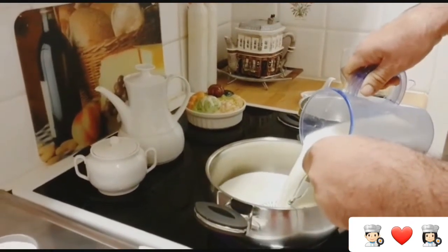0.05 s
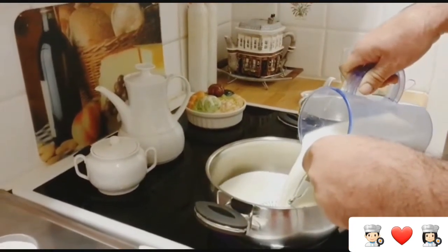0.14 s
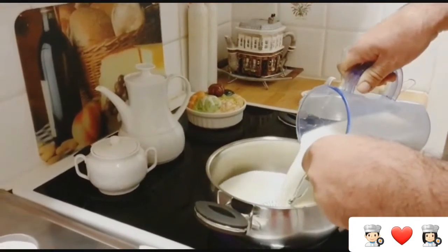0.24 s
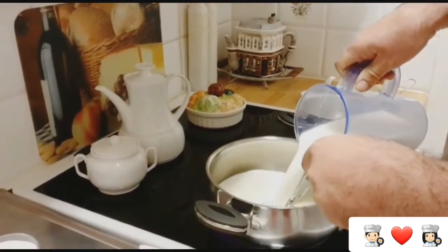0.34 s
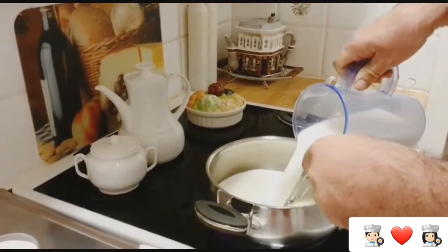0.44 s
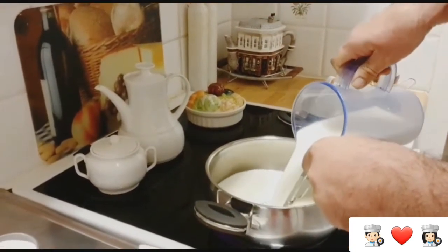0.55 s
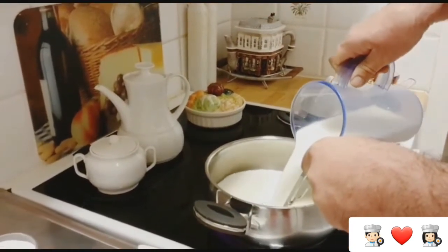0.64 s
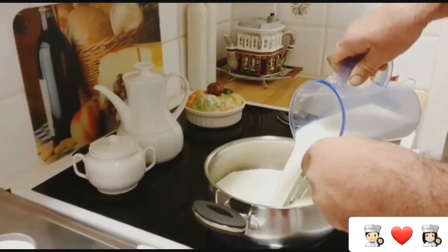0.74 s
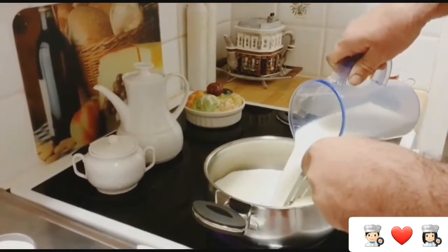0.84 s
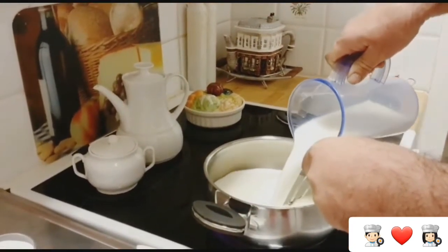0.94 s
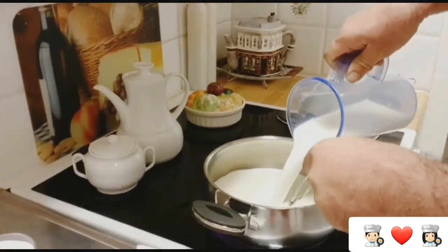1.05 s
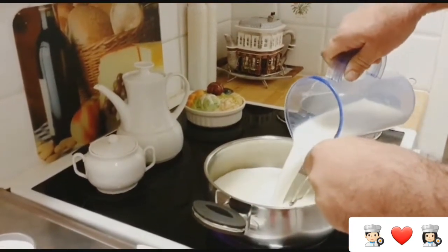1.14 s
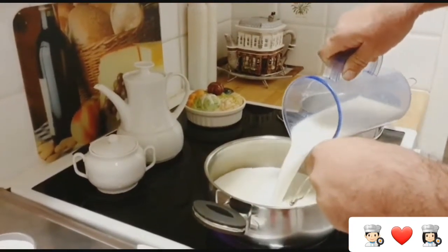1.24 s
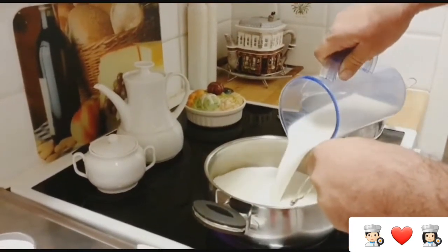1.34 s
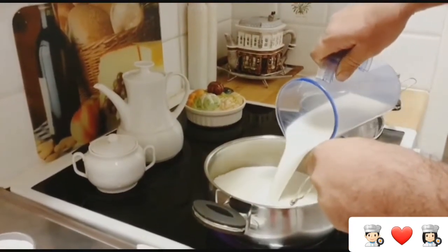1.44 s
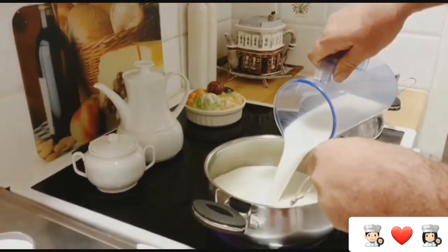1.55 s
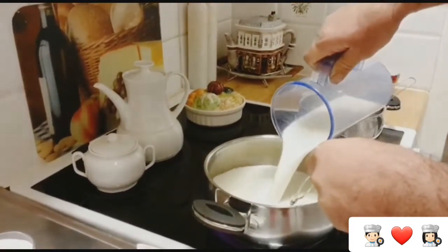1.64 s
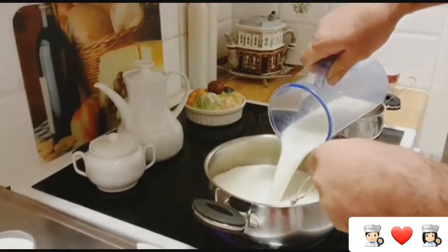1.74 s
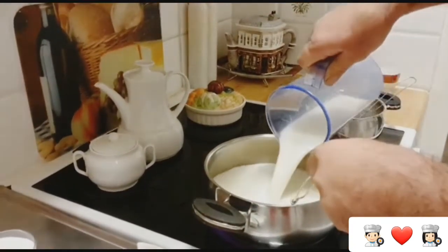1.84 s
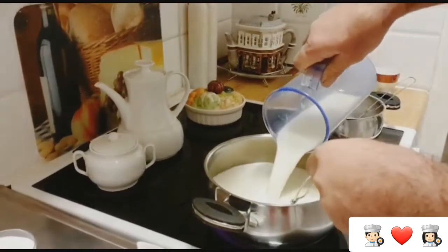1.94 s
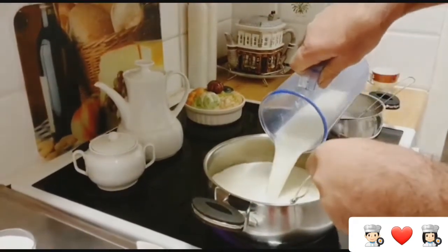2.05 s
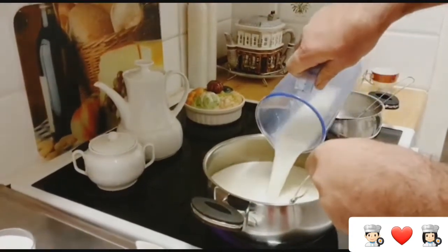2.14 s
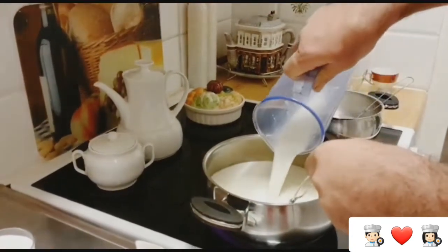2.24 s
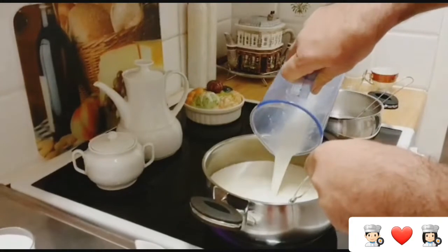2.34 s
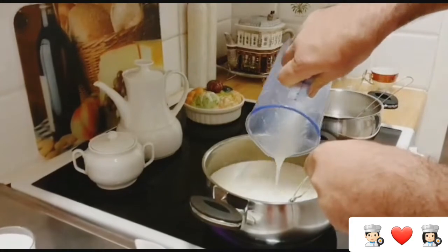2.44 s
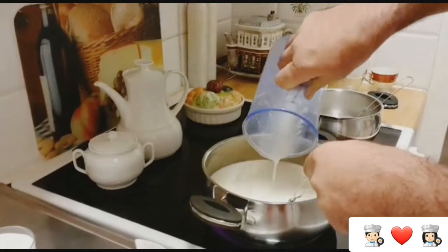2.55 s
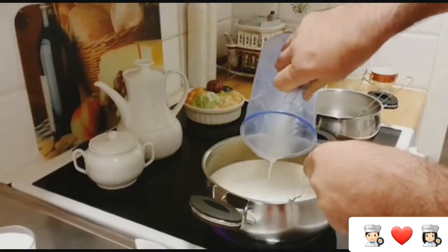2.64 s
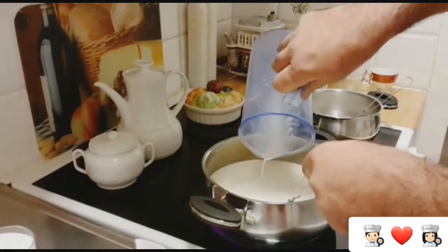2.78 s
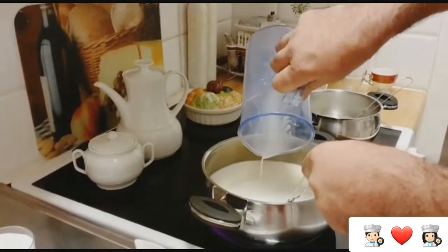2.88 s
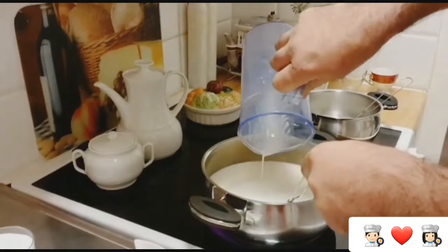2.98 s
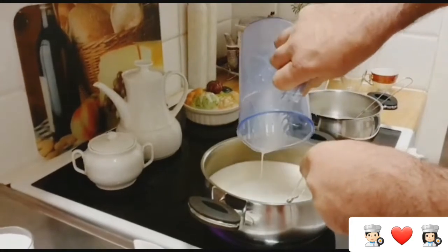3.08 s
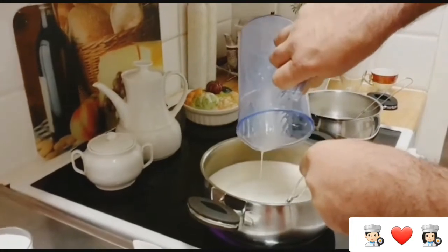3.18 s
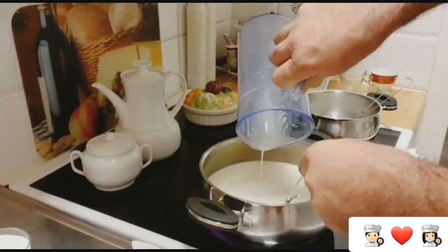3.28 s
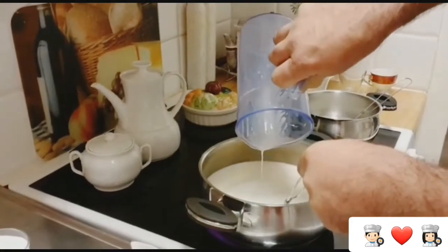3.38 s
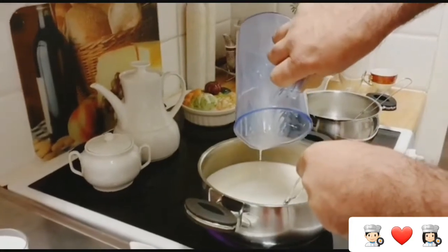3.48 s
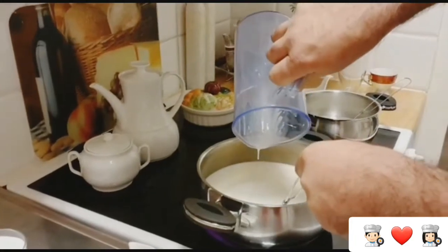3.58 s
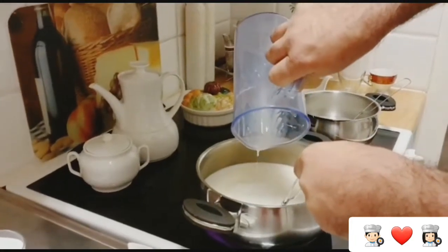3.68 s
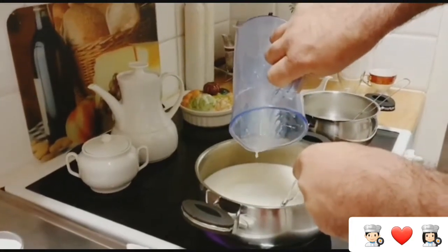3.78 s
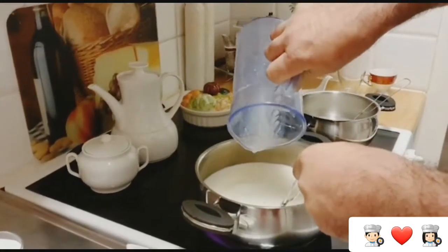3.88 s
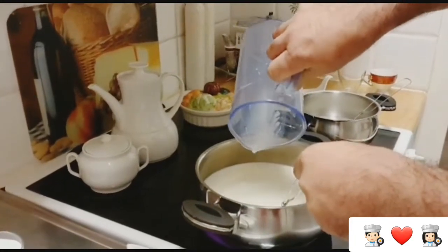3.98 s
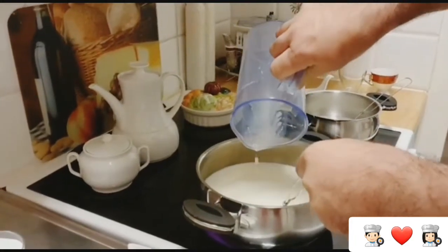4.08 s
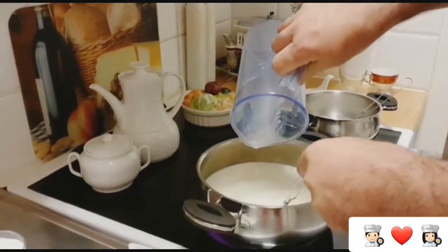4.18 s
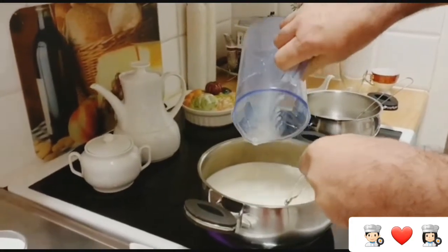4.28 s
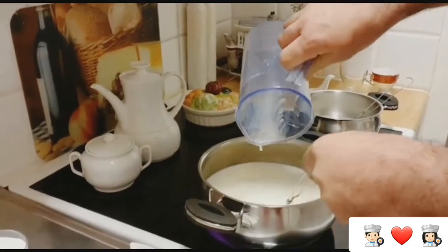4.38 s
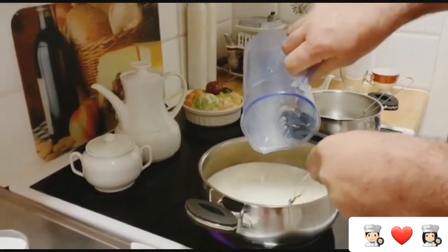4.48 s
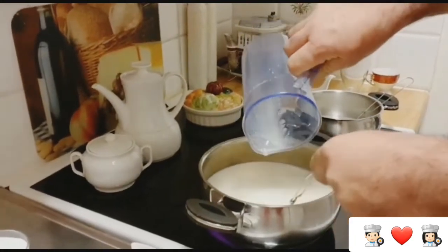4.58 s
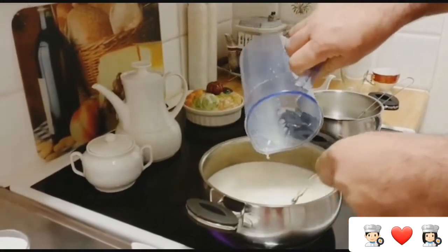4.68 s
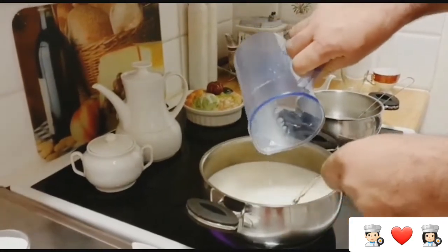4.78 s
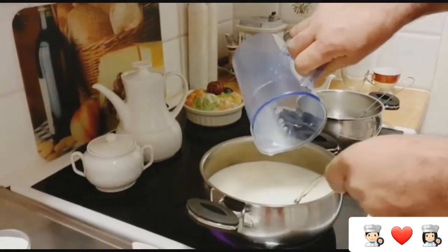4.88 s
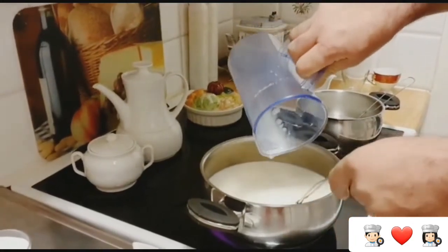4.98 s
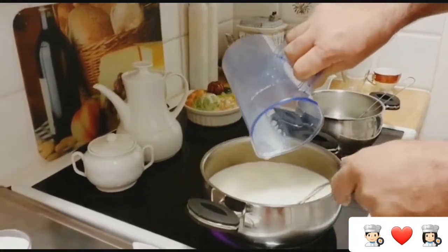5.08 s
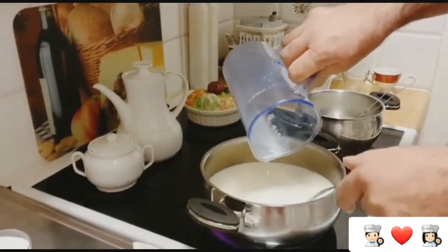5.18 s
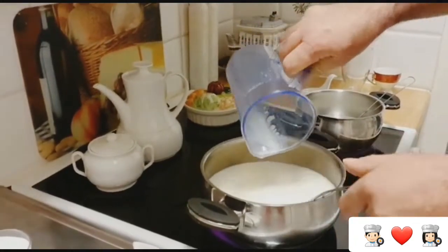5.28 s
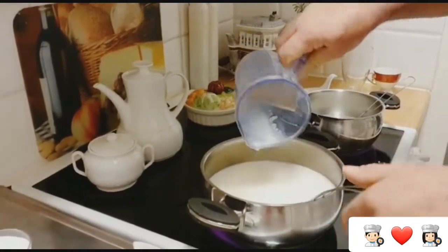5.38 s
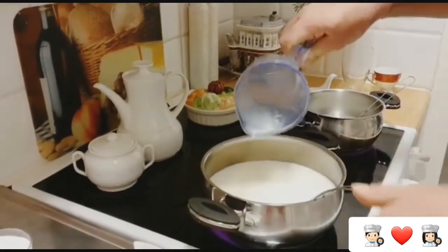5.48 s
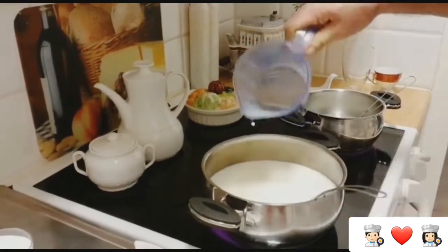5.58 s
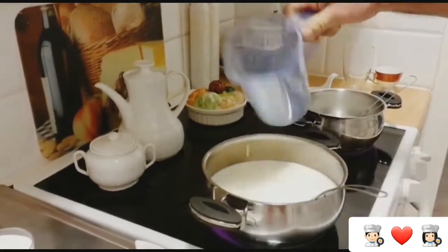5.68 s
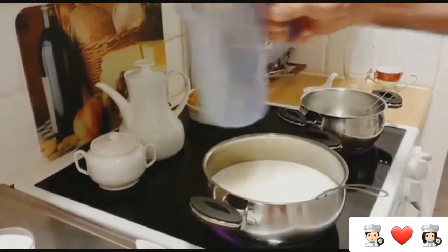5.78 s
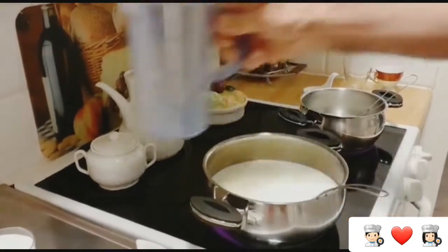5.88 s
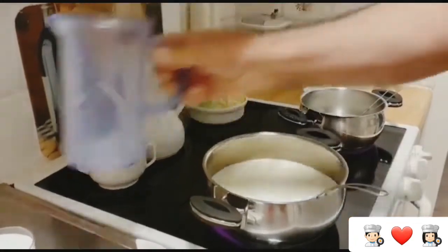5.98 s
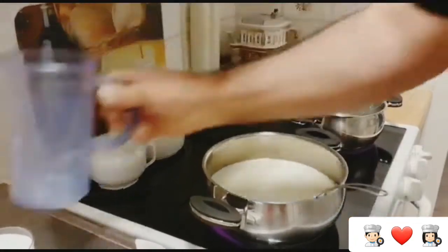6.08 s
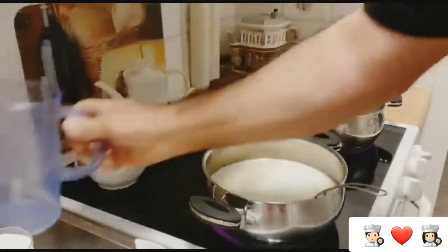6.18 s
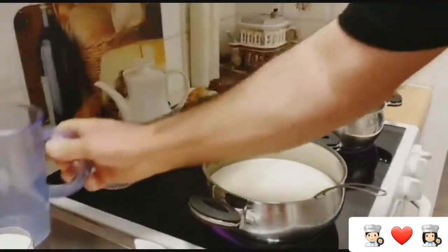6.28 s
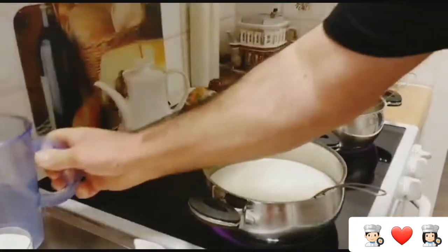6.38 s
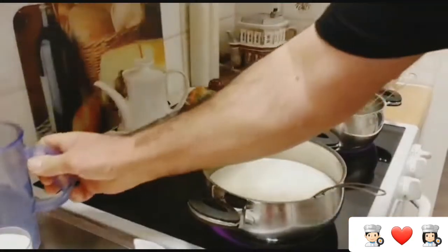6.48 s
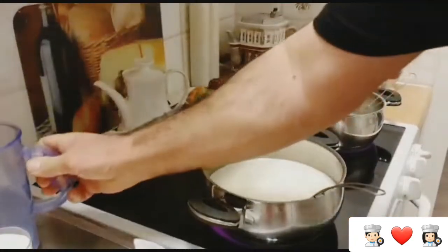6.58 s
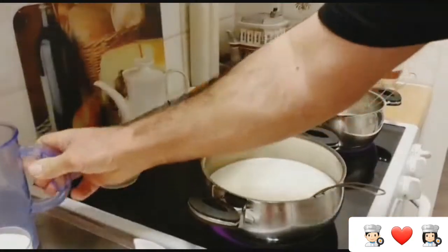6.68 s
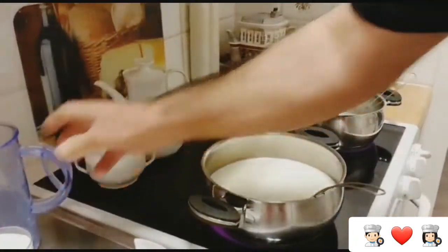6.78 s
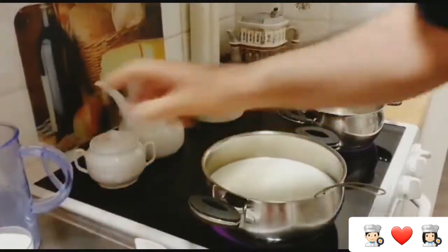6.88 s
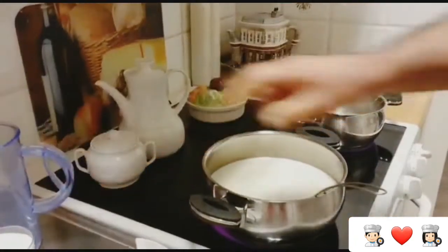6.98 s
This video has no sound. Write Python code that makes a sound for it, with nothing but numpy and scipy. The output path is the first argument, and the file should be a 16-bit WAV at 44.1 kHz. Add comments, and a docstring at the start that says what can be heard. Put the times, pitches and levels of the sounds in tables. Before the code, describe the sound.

Close stereo microphones catch milk trickling into a metal pot, busiest at first, then quieter, then a run of distinct drips. Rubbing and scraping from hands and a wire whisk follow, with one faint ting and a delicate metallic clink. Near the end a plastic jug lands firmly on the counter and rattles briefly. Quiet hum and short tiled-kitchen echoes surround it all.

```python
"""Milk runs from a plastic jug into a steel pot: decaying tones of bubbles, a trickle and noisy spray.
A hand then shifts a wire whisk along the rim and drops it (filtered grit, ringing modes), one wire tings
and the jug is set down on the counter (short pushes ring the modes of both).
A small hard kitchen with mains hum and floor bumps, heard by two spaced microphones."""
import sys
import numpy as np
from scipy import signal
from scipy.fft import rfft, irfft, next_fast_len
from scipy.io import wavfile
from scipy.ndimage import uniform_filter1d

SR = 44100
rng = np.random.default_rng(int(sys.argv[2]) if len(sys.argv) > 2 else 0)


def transcribe(u):
    """Save the signal u as a 16-bit wav file named by the first command-line argument.

    u: samples, shape (n,) or (channels, n), limited to [-1, 1]; the rate is SR.
    q: integer samples, one column per channel.
    """
    v = np.clip(np.atleast_2d(u).T, -1, 1)
    q = np.round(v * 32767).astype(np.int16)
    wavfile.write(sys.argv[1], SR, q)


N = 310023
LEFT_RIGHT = np.array([[1], [-1]])


def undb(db):
    """Gain of a level in dB."""
    return 10 ** (np.asarray(db) / 20)


def unit(x):
    """Scale to rms 1."""
    return x / np.sqrt(np.mean(x ** 2))


def colour(x, points):
    """Filter by (Hz, dB) points joined on a log frequency axis."""
    size = next_fast_len(x.shape[-1])
    hz, db = np.transpose(points)
    bin_hz = np.fft.rfftfreq(size, 1 / SR) + 1
    gain = undb(np.interp(np.log(bin_hz), np.log(hz), db))
    return irfft(rfft(x, size) * gain, size)[..., :x.shape[-1]]


def band(x, lo_hz, hi_hz):
    """Band-pass."""
    edges_hz = [lo_hz, min(hi_hz, .45 * SR)]
    return signal.sosfilt(signal.butter(2, edges_hz, "band", fs=SR, output="sos"), x)


def ring(x, hz, t60_s):
    """One decaying mode; an impulse of 1 rings with peak near 1."""
    pole = np.exp(2j * np.pi * hz / SR - np.log(1000) / (max(t60_s, .002) * SR))
    return signal.lfilter([1], [1, -pole], x).imag


def curve(table):
    """Columns of a table, the first being seconds, interpolated at every sample."""
    s, *columns = np.transpose(table)
    return [np.interp(np.arange(N) / SR, s, c) for c in columns]


def add(out, s, x):
    """Mix a short sound in at a time."""
    i = int(s * SR)
    out[..., i:i + x.shape[-1]] += x[..., :max(N - i, 0)]


def walk(rate_hz):
    """Random levels at a rate, joined by straight slews; spread near 1."""
    k = int(SR / rate_hz)
    return uniform_filter1d(np.repeat(rng.standard_normal(N // k + 1), k), k)[:N]


def grit(rate_hz, scatter_db):
    """Random clicks of very uneven size, scaled to rms 1."""
    chance, sign, size = rng.random((3, N))
    clicks = (chance < rate_hz / SR) * np.sign(sign - .5)
    return unit(clicks * undb(-scatter_db * np.log(size + 0.0032)))


def swell(rise_s, fade_s):
    """Rises to 1, then dies away by 60 dB over the fade."""
    rise_s = max(rise_s, .001)
    t = np.arange(int((rise_s + fade_s) * SR)) / SR
    return np.minimum(t / rise_s, 1) ** 2 * undb(-60 * np.maximum(t - rise_s, 0) / max(fade_s, .01))


def bubble(hz, t60_s, glide):
    """A decaying tone; with glide above 0 its pitch rises, as a bubble's does nearing the surface."""
    t = np.arange(int(t60_s * SR) + 2) / SR
    tone = np.sin(2 * np.pi * hz * t * (1 + glide * t / t60_s))
    return tone * undb(-60 * t / t60_s) * np.clip(t / 0.0019, 0, 1) ** 2


def struck(blows, modes, split):
    """Blows ring each mode of a body as a close beating pair; neighbours swing in opposition."""
    first = np.flatnonzero(blows)[0]
    out, x = np.zeros(N), blows[first:]
    for k, (hz, db, t60_s) in enumerate(modes):
        pair = ring(x, hz, t60_s) + 0.66 * ring(x, (1 + split) * hz, t60_s)
        out[first:] += (-1) ** k * undb(db) * pair
    return out


def heard(x, lag_samples, wet_db, pan_db=0):
    """Direct sound reaches the left microphone late by the lag; echoes differ, less so in the bass."""
    room_t60_s, room_treble_t60_s, near_t60_s = 0.45, 0.25, 0.049
    far_db = -9.5  # wider room under the echoes of pot, tiles and counter
    t = np.arange(int(.5 * SR)) / SR
    mid, side = rng.standard_normal((2, len(t)))
    pair = mid + colour(side, [(150, -20.0), (600, 0.5), (9000, -1.5)]) * LEFT_RIGHT
    pair = colour(pair, [(80, 0.0), (400, 1), (9000, 0.0)])
    low = signal.sosfilt(signal.butter(1, 2500, fs=SR, output="sos"), pair)
    far = low * undb(-60 * t / room_t60_s) + (pair - low) * undb(-60 * t / room_treble_t60_s)
    tail = undb(far_db) * far + pair * undb(-60 * t / near_t60_s)
    tail = tail * np.clip((t - .002) / 0.0019, 0, 1)  # first walls are under a metre away
    tail = undb(wet_db) * tail / np.sqrt(np.sum(tail ** 2) / 2)
    x = x * np.ones((2, 1))
    place = np.arange(N)
    left = np.interp(place - lag_samples / 2, place, x[0])
    right = np.interp(place + lag_samples / 2, place, x[1])
    direct = np.array([left, right]) * undb(pan_db * LEFT_RIGHT / 2)
    return direct + signal.fftconvolve(x, tail, axes=1)[:, :N]


def kitchen():
    """Mains hum wavering in pitch and level, dull bumps through the floor, and steady room air noise."""
    # Each row: multiple of the buzz, level in dB.
    hum_partials = [(1, -64), (2, -60.5), (3, -65), (4, -81)]
    # Each row: start in seconds, level in dB, pitch in Hz, length in seconds.
    bumps = [(4.606, -45.5, 33.2, 0.062), (5.14, -46.5, 35, 0.084), (5.488, -40.5, 133, 0.038),
             (6.7, -41, 31, 0.32)]
    # Air spectrum. Each row: frequency in Hz, relative level in dB.
    air_spectrum = [(20, -26), (35, -7), (55, 5), (75, -8.5), (102, -1), (160, -9.5), (300, -12),
                    (450, -15.5), (560, -24), (850, -30.5), (1300, -33), (2600, -33.5), (8000, -42),
                    (14500, -48.5)]
    buzz_hz, air_db = 100.2, -60
    t, hum = np.arange(N) / SR, np.zeros(N)
    cycles = buzz_hz * t + np.cumsum(0.35 * walk(8)) / SR
    for multiple, db in hum_partials:
        level = np.sqrt(2) * undb(db + 0.91 * walk(5.4))
        hum += level * np.sin(2 * np.pi * (round(multiple) * cycles + rng.random()))
    for s, db, hz, length_s in bumps:
        span = np.arange(int(length_s * SR))
        add(hum, s, undb(db) * np.hanning(len(span)) * np.sin(2 * np.pi * hz * span / SR))
    mid, side = colour(rng.standard_normal((2, N)), air_spectrum)
    side = colour(side, [(40, -1.0), (150, -18.0), (300, -6.0), (800, 1.0), (12000, -0.5)])
    air = (mid + side * LEFT_RIGHT) * undb(air_db + 2.5 * walk(3.14)) / np.std(mid)
    return air + hum * undb(-0.4 * LEFT_RIGHT)


def ting():
    """One wire touches the rim: a short push rings beating modes beside a falling whistle."""
    # Modes of the wire. Each row: frequency in Hz, level in dB, t60 in seconds.
    wire = [(3790, 0, .14), (3845, -2, .13), (4020, -4, .03), (4300, -2, .014), (4600, -4, .012)]
    ting_s, ting_db, chirp_db = 3.9155, -42.5, -53
    touch, chirp = np.zeros((2, N))
    add(touch, ting_s, np.hanning(7) * undb(ting_db) / 3)
    add(chirp, ting_s, bubble(4600, t60_s=.09, glide=-0.22) * undb(chirp_db))
    return struck(touch, wire, split=0.004) + chirp


def jug():
    """The base rocks down in short rattles on the counter; a softer contact rings fewer high modes."""
    # Each row: start in seconds, strength in dB, nominal contact in ms, jug drive against counter in dB.
    knocks = [(6.6494, -21.5, 0.11, -8), (6.6555, -32.5, 0.18, -6), (6.662, -32, 0.8, -4),
              (6.674, -36.5, 0.3, 6), (6.7, -39, 0.7, 0), (6.771, -42, 0.56, 13), (6.78, -43.5, 0.51, 7),
              (6.791, -54, 0.92, 4), (6.802, -42, 0.69, 5), (6.831, -47.5, 1.1, 7), (6.865, -47, 1.3, 6.5),
              (6.873, -51.5, 1.35, 6), (6.936, -47, 1.2, 0), (6.945, -42, 1.4, 2), (6.958, -44, 0.44, 13.5),
              (6.968, -46, 0.72, 9.5)]
    # Modes of counter, then hollow jug. Each row: frequency in Hz, level in dB, t60 in seconds.
    counter = [(96, -5, .3), (125, -6, .25), (163, 0, .22), (200, -7, .2), (238, -6, .2), (283, -5, .2),
               (324, -8, .15), (400, 0, .16), (505, -10, .09), (556, -11, .08), (690, -16, .05),
               (781, -15, .05), (889, -15, .05), (1047, -8, .05), (1180, -14, .04), (1330, -14, .035),
               (1600, -13, .04), (1810, -15, .04), (1990, -11, .04), (2090, -11, .1), (2150, -2, .05),
               (2410, -17, .03), (3900, -19, .03)]
    hollow = [(439, 2, 0.066), (466, -0.5, 0.068), (906, -11.5, 0.022)]
    blows, draws = np.zeros((2, N)), rng.standard_normal((len(knocks), 900))
    for (s, db, contact_ms, hollow_db), draw in zip(knocks, draws):
        push = np.hanning(int(max(contact_ms, .05) * SR / 1000) + 3)
        fade = undb(-8 - 60 * np.arange(len(draw)) / SR / 0.065)
        rattle = np.diff(draw, prepend=0) * fade  # light bounces move little bass
        rattle[0] = 1
        drive = undb(db + np.array([[0], [hollow_db]]))
        add(blows, s, drive * np.convolve(rattle, push / push.sum()))
    bodies = struck(blows[0], counter, split=0.021) + struck(blows[1], hollow, split=0.032)
    return band(bodies, 39, 10000)  # the deepest bass and the top are kept out


def whisk():
    """Wires land in quick succession; each brief noisy contact rings the rim."""
    # Each row: time of the peak in seconds, strength in dB.
    clinks = [(5.351, -53.5), (5.357, -60.5), (5.364, -58.5), (5.377, -59.5), (5.395, -64)]
    # Modes of the rim. Each row: frequency in Hz, level in dB, t60 in seconds.
    rim = [(253, -7, .22), (614, -9, .11), (860, -11, .08), (1130, -8, .11), (1420, -10, .08),
           (1720, -3, .11), (1893, 0, .09), (1970, -3, .06), (2045, 1, .1), (3128, -8, .09),
           (3330, -10, .09), (3575, -7, .09), (4027, -5, .1), (4750, -1, .08), (4960, 0, .08),
           (5650, -5, .1), (6895, -5, .14), (7186, -4, .14), (7281, -3, .16), (7484, -4, .12),
           (7935, -3, .1), (8076, 0, .1), (8707, -4, .08), (9050, -8, .08), (9526, 1, .1), (10060, -5, .08),
           (10320, -5, .07), (10775, -6, .1), (11640, -1, .1), (12300, -7, .09), (12640, -5, .1),
           (13240, -8, .08), (14160, -11, .07)]
    rise_s, fade_s = 0.0013, 0.008
    landing = np.zeros(N)
    for s, db in clinks:
        add(landing, s - rise_s, swell(rise_s, fade_s) * undb(db))
    return struck(landing * rng.standard_normal(N), rim, split=0.014)


def handling():
    """Gritty friction of hand, whisk and jug over a sleeve rustle, shaped in three frequency ranges."""
    # Each row: time near the peak in seconds, level in dB, treble and bass against it in dB,
    # fade t60 in seconds.
    rubs = [(3.632, -59.5, -3, -1, 0.1), (3.654, -49.5, -2.5, -1.5, 0.2), (3.828, -67.5, -3, -10, 0.35),
            (4.001, -59.5, -8, -2, 0.091), (4.171, -45, -4, -1, 0.19), (4.238, -60.5, -1, 8, 0.059),
            (4.281, -56, -4.5, 0, 0.15), (4.326, -49, -5, -1, 0.14), (4.368, -60.5, -3.5, -3, 0.067),
            (4.824, -55, -11, -2, 0.23), (5.027, -49.5, -13, -1, 0.089), (5.13, -52, -26, -7, 0.037),
            (5.281, -46, -6, -1, 0.06), (5.31, -68, 13, 8, 0.14), (5.354, -58, 21.5, -10, 0.11),
            (5.399, -59, 4, 4.5, 0.37), (5.629, -54, -8, 6.5, 0.14), (5.652, -46, -2.5, -1, 0.11),
            (5.682, -54, -5, -6, 0.044), (5.773, -71.5, 11, -22, 0.09), (5.872, -67, 1, 3, 0.035),
            (5.917, -57, -9.5, 3.5, 0.46), (5.959, -61, -12, -26, 0.13), (5.998, -59.5, -18, -12, 0.18),
            (6.076, -60.5, -8.5, 1, 0.2), (6.183, -60, 2.5, -5, 0.12), (6.377, -42.5, -7, 0.5, 0.13),
            (6.419, -60, 3.5, 2, 0.074), (6.47, -60.5, -10, 5, 0.14), (6.656, -30.5, -10, 8, 0.081),
            (6.772, -47, -21, 6.5, 0.17), (6.817, -50, -7, -15, 0.036), (6.936, -63.5, -2, 21, 0.041),
            (6.959, -55, -8.5, 16, 0.031)]
    # Sleeve and hands moving. Each row: time in seconds, level in dB.
    rustle = [(3.5, -95), (3.78, -79.5), (4.14, -73), (4.68, -96), (4.95, -78.5), (5.06, -62),
              (5.38, -54.5), (5.57, -71.5), (6.0, -64), (6.13, -95), (6.4, -62), (6.61, -79.5), (6.86, -67),
              (7.03, -66)]
    # Friction spectrum. Each row: frequency in Hz, gain in dB.
    rub_colour = [(40, -6.5), (110, -2.5), (300, 1), (800, -2.5), (1300, 2.5), (2000, 4), (3500, -1.5),
                  (6000, -2), (9000, -10.5), (14500, -25.5)]
    rise_s, rustle_treble_db, rustle_bass_db = 0.018, -8, -2
    level_db, = curve(rustle)
    ranges_db = np.array([[0], [rustle_treble_db], [rustle_bass_db]])
    shapes = undb(level_db + 0.28 * walk(8.6) + ranges_db)
    for s, db, treble_db, bass_db, fade_s in rubs:
        gains = undb(db + np.array([[0], [treble_db], [bass_db]]))
        add(shapes, s - 0.81 * rise_s, swell(rise_s, fade_s) * gains)
    slip = colour(grit(5000, 2.76), rub_colour)
    middle = band(slip, 597, 4550)
    treble = band(band(slip, 6330, 15000), 6370, 16000)
    bass = band(slip, 25, 928)
    return sum(unit(part) * shape for part, shape in zip((middle, treble, bass), shapes))


def trickle(count):
    """Many small bubbles, pitched around resonances of the air above the milk; the largest hardly heard."""
    # Each row: centre in Hz, scatter in Hz, level in dB.
    pot_air = [(1448, 245, -13), (2090, 134, -3.5), (2756, 160, -4), (3470, 300, -4), (4660, 610, -5.5),
               (2136, 783, -3.5), (800, 199, -10.5)]
    pour_ends_s, scatter_db = 3.6, 3.0
    out, draws = np.zeros(N), np.c_[rng.random((count, 3)), rng.standard_normal(count)]
    for k, (when, size, length, off) in enumerate(draws):
        hz, scatter_hz, db = pot_air[k % len(pot_air)]
        pitch_hz = 450 + abs(hz + scatter_hz * off - 450)
        gain = min(pitch_hz / 1500, 1) ** 2 * undb(db - scatter_db * np.log(size + 0.016))
        t60_s = (12 + 30 * length) / pitch_hz
        add(out, pour_ends_s * when, bubble(pitch_hz, t60_s, glide=0.08) * gain)
    return out / np.std(out[:int(pour_ends_s * SR)])


def milk():
    """Each plink is a main bubble among smaller ones; each gush brings a gurgling trickle and spray."""
    # Bubbles and drips. Each row: start in seconds, level in dB, pitch in Hz, left minus right in dB,
    # smaller bubbles against the main one in dB.
    plinks = [(0.012, -39.5, 3300, 4, -12), (0.035, -28, 2180, 0, -18), (0.04, -36, 1510, 0, -16),
              (0.065, -26, 2207, -1, -22), (0.064, -35, 2880, -5, 1), (0.085, -50, 2170, -2, -8),
              (0.109, -38.5, 2850, 0, 8), (0.131, -57, 2220, -5, -13), (0.195, -39, 2220, 1, -7),
              (0.198, -38, 2860, 0, 3), (0.235, -57, 2780, -7, -6), (0.255, -38.5, 2170, -3, -7),
              (0.27, -37, 2180, 0, -12), (0.28, -40.5, 2850, 0, -10), (0.284, -43, 2170, -8, -13),
              (0.3, -51, 2800, 0, -12), (0.32, -53, 2250, -2, -10), (0.36, -50, 2130, 0, -5),
              (0.398, -44, 2790, 3, -14), (0.394, -47, 1670, -3, -13), (0.426, -51, 2380, 3, -14),
              (0.618, -41.5, 4550, 6, -15), (0.619, -44.5, 1710, -2, -4), (0.685, -57, 1310, 4, -9),
              (0.703, -54.5, 1250, 0, -8), (0.711, -47, 2730, 6, -4), (0.717, -48, 2140, -4, -6),
              (0.76, -58, 2100, 0, -10), (0.782, -47.5, 2430, 0, -12), (0.84, -49, 1960, 0, -12),
              (0.879, -49, 2850, -4, -12), (0.886, -59, 1950, 5, -10), (0.93, -56, 1330, -2, -1),
              (0.957, -44.5, 5580, -2, -11), (0.966, -47, 2310, 0, -8), (0.967, -53, 1310, -6, -8),
              (0.978, -50, 2160, -2, -4), (0.985, -51, 1220, 2, -4), (1.005, -48, 2260, 5, -11),
              (1.03, -48, 2170, -3, -9), (1.08, -58, 2360, 0, -8), (1.081, -53.5, 4530, 4, -8),
              (1.473, -53.5, 1310, -2, -18), (1.825, -53, 2760, -1, 0), (1.892, -50, 1244, -5, -8),
              (2.128, -45.5, 3120, 1, -4), (2.134, -43.5, 2690, 5, -1), (2.148, -52, 2370, 2, -3),
              (2.215, -56.5, 3220, 2, 0), (2.155, -53, 2760, 0, 7.5), (2.273, -52.5, 2400, 4, 4),
              (2.308, -46, 1390, -6, -7), (2.472, -49, 1320, -7, -2), (2.473, -53, 2170, 0, -14),
              (2.488, -51, 1240, 1, -4), (2.538, -50.5, 2110, -2, 0), (2.54, -56, 940, 2, -12),
              (2.558, -53, 960, -8, -14), (2.578, -56, 980, 4, -12), (2.622, -50, 2230, 0, -12),
              (2.63, -50, 726, 3, -4), (2.659, -46, 1400, -5, -3), (2.645, -48, 2100, 1, -5),
              (2.657, -43, 2270, -1, -12), (2.715, -38, 2200, -1, -32), (2.759, -43.5, 2120, 0, -4),
              (2.762, -53, 1410, -3, 9), (2.77, -54, 3030, -4, -8), (2.83, -54, 2930, 0, 8.5),
              (2.834, -48.5, 1525, -3, -9), (2.85, -53, 2420, 0, -14), (2.957, -43.5, 1430, -6, -27),
              (3, -46.5, 4570, 3, 0), (3.03, -40.5, 2180, -1, -24), (3.111, -40, 2020, -2, 4.5),
              (3.14, -45, 2900, -4, -7), (3.139, -42.5, 1660, 2, -4), (3.25, -40, 2154, -1, -29),
              (3.295, -45, 2240, -1.5, -8), (3.472, -52, 4080, -3, 9), (4.012, -51, 980, -2, -5),
              (4.831, -47.5, 946, 0, -6), (5.026, -38, 970, 0, 5), (5.041, -46, 1090, 4, -15),
              (5.132, -44.5, 1495, -3, 13.5), (5.14, -49.5, 2550, 0, 13.5), (5.155, -42, 1890, -3, -6)]
    # Each row: time of the peak in seconds, level in dB, rise in seconds, fade t60 in seconds,
    # spray against bubbles in dB.
    gushes = [(.02, -53.5, 0.32, 0.54, -7.5), (0.067, -60, 0.044, 0.33, 6),
              (0.199, -68.5, 0.024, 0.13, 6.5), (.27, -58, 0.076, 0.48, -6.5),
              (0.399, -67.5, 0.034, 0.6, -10), (0.621, -56, 0.028, 0.12, -5), (.71, -62, 0.062, 0.41, -3),
              (.85, -64.5, 0.083, 0.63, -12), (.975, -64.5, 0.028, 0.54, -8.5),
              (1.09, -79.5, 0.017, 0.32, 6), (1.49, -69.5, 0.43, 0.33, -10), (1.881, -64, 0.14, 0.41, -6),
              (2.17, -80, 0.066, 0.49, 10), (2.319, -65.5, 0.11, 0.24, -7.5),
              (2.475, -74, 0.031, 0.28, -19), (2.545, -64, 0.03, 0.57, -15), (2.648, -60, 0.051, 0.13, -1),
              (2.765, -69, 0.019, 0.26, -15), (2.835, -66.5, 0.03, 0.91, -9.5),
              (3.12, -60, 0.033, 0.063, -34), (3.25, -72.5, 0.023, 0.47, -27), (3.48, -76, 0.014, 0.26, 0)]
    main_t60_s, main_hz, longer_when_low = 0.023, 2300, 0.55  # t60 at main_hz; power of its pitch law
    small_t60_s, spread_octaves = 0.0077, 0.23  # spread to either side
    tones, draws = np.zeros((2, N)), rng.random((len(plinks), 5, 2))
    for (s, db, hz, pan_db, others_db), draw in zip(plinks, draws):
        gain = undb(db + pan_db * LEFT_RIGHT / 2)
        t60_s = main_t60_s * (main_hz / hz) ** longer_when_low
        add(tones, s, bubble(hz, t60_s, glide=0.0041) * gain)
        for place, (jitter, late) in enumerate(draw):  # pitches fill the spread evenly
            octaves = spread_octaves * 2 * ((place + jitter) / len(draw) - .5)
            small = bubble(hz * 2 ** octaves, small_t60_s, glide=0.022)
            add(tones, s + 0.0096 * late ** 2, small * gain * undb(others_db))
    flow = np.zeros((2, N))
    for s, db, rise_s, fade_s, spray_db in gushes:
        shape = swell(rise_s, fade_s)[int(max(rise_s - s, 0) * SR):]
        add(flow, max(s - rise_s, 0), shape * undb(db + np.array([[0], [spray_db]])))
    droplets = grit(4000, scatter_db=2.5)
    spray = unit(band(droplets, 3550, 8700)) * undb(2 * walk(42.9))
    return tones + flow[0] * trickle(count=5600) + flow[1] * spray


def scene():
    """All sources in their places."""
    return (heard(milk(), lag_samples=-2.4, wet_db=-0.6)
            + heard(handling(), lag_samples=4., wet_db=0.5, pan_db=-1.0)
            + heard(whisk(), lag_samples=5.07, wet_db=-6, pan_db=-1.0)
            + heard(jug(), lag_samples=-12.0, wet_db=-3, pan_db=1.0)
            + heard(ting(), lag_samples=5.7, wet_db=-12, pan_db=-5.5)
            + kitchen())


def record(dry):
    """The recorder thins the bass, lifts the upper treble and cuts the top."""
    # Each row: frequency in Hz, gain in dB.
    microphone = [(100, -5.5), (8000, 2), (10000, -0.5), (12500, 11), (14500, 5.5)]
    top_hz = 14450
    low_pass = signal.ellip(10, .2, 60, top_hz, fs=SR, output="sos")
    return signal.sosfilt(low_pass, colour(dry, microphone))


dry = scene()
out = record(dry)
transcribe(out)
```